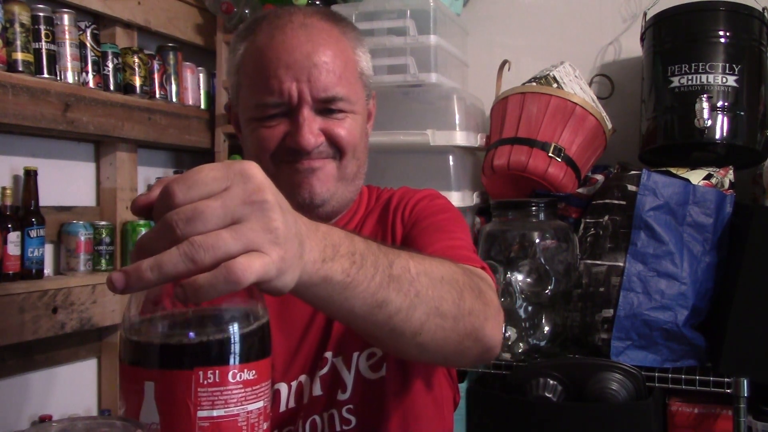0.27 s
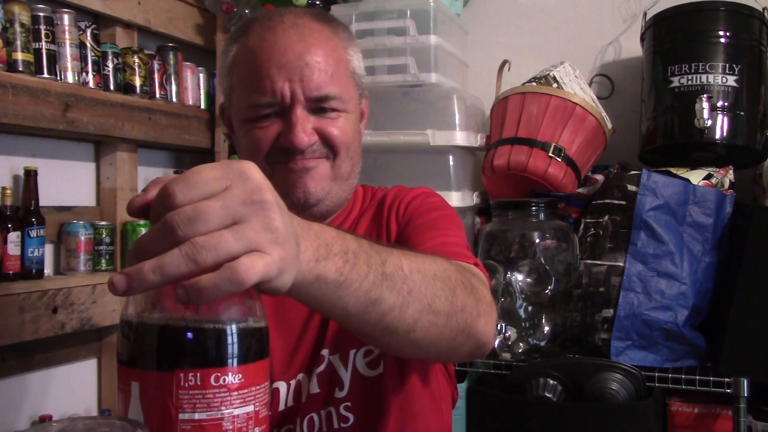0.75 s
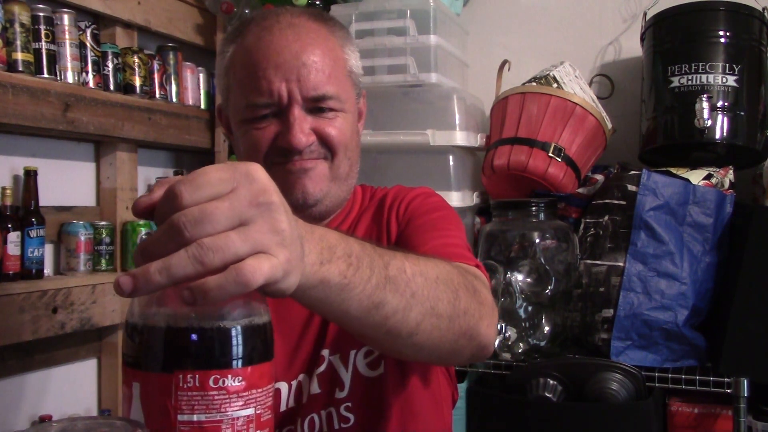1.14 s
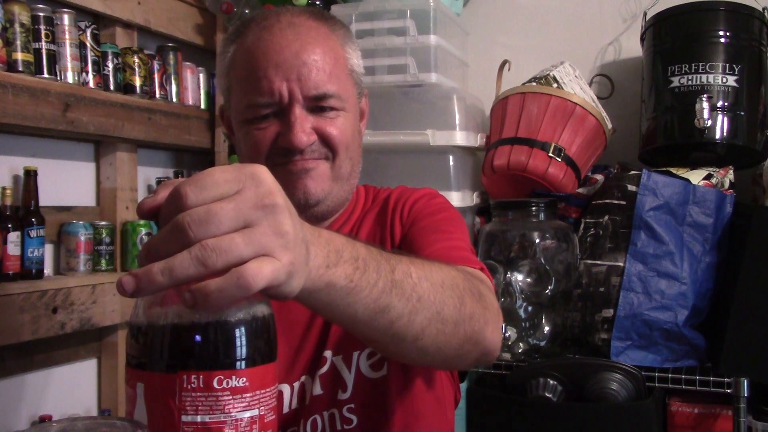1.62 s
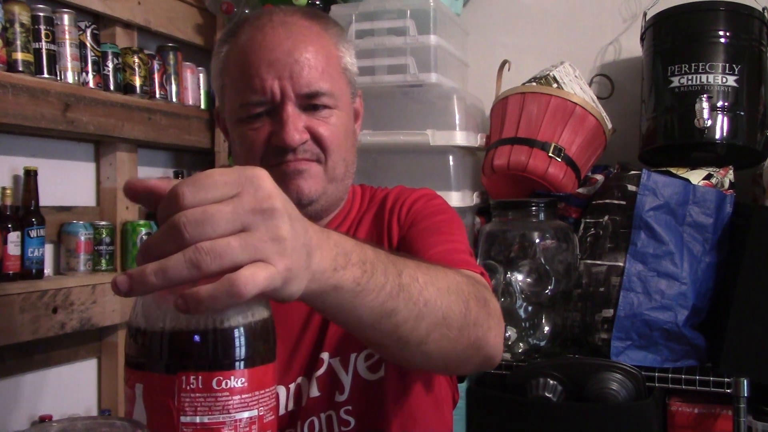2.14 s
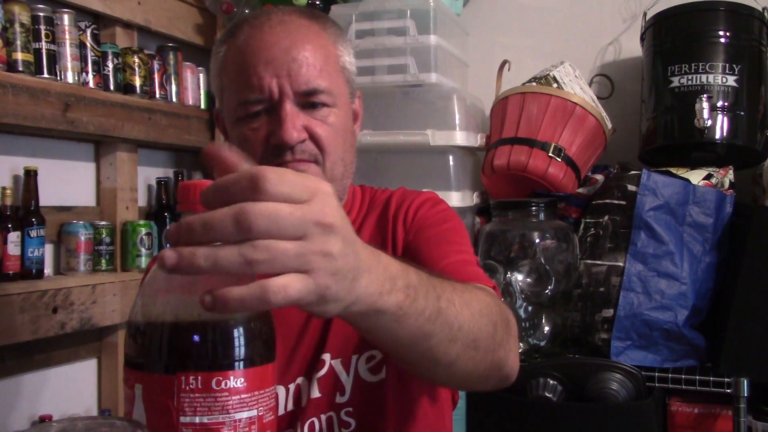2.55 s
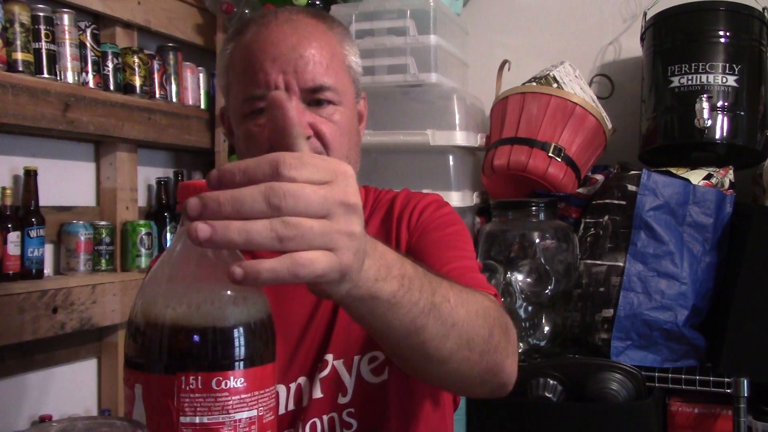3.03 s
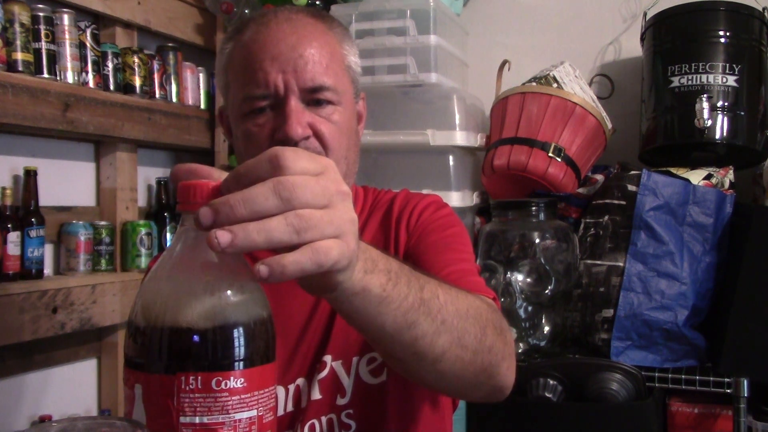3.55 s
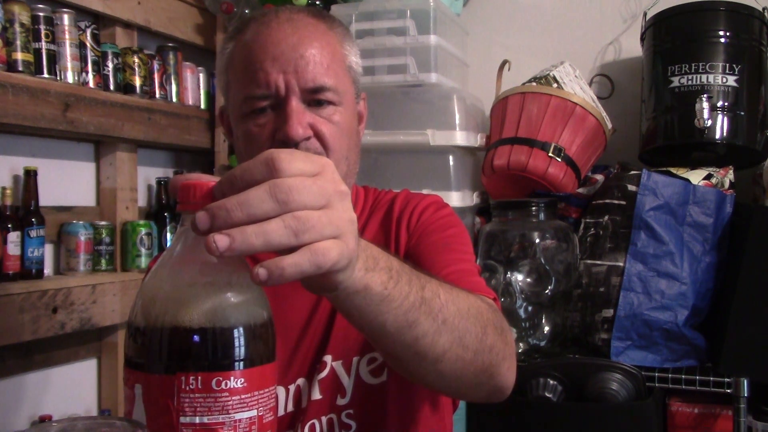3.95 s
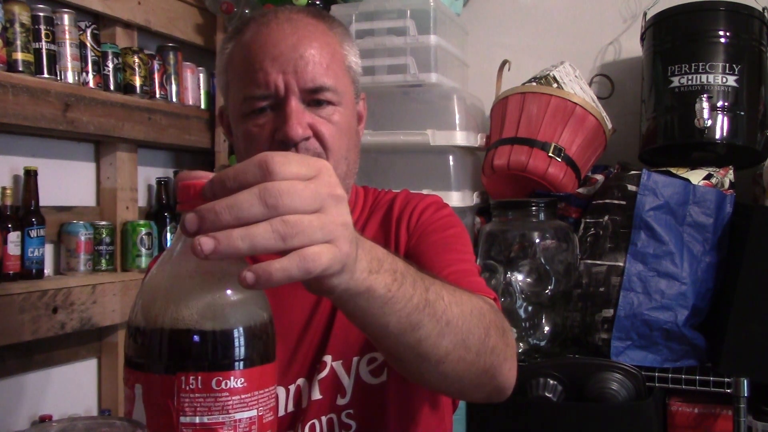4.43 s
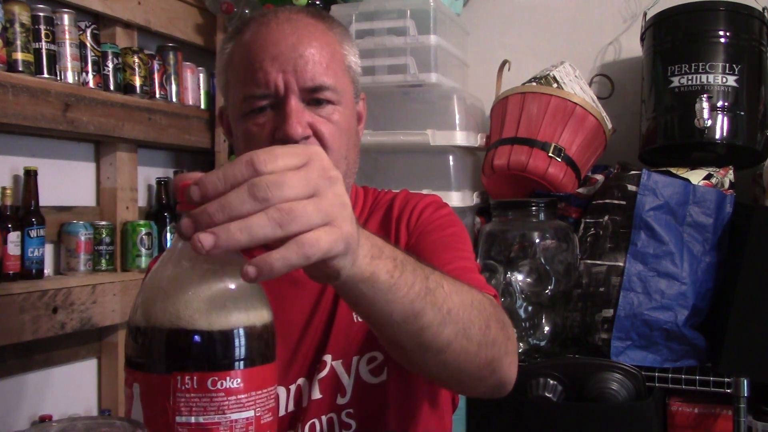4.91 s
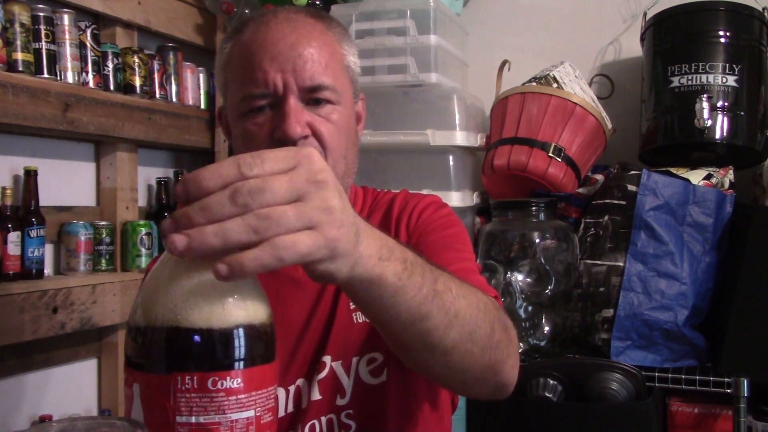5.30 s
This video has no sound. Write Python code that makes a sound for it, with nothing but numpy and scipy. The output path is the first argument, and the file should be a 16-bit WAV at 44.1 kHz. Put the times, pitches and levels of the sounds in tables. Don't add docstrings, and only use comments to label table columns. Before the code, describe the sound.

A loud, bright gas hiss bursts from a loosened plastic bottle cap, dies away to a thin whistling leak, then the cap rasps shut.

```python
import sys
import numpy as np
from scipy import signal
from scipy.fft import rfft, irfft, next_fast_len
from scipy.io import wavfile

SR = 44100
rng = np.random.default_rng(int(sys.argv[2]) if len(sys.argv) > 2 else 0)


def rack_gain(trim_db):
    fader = np.asarray(trim_db, float)
    return 10 ** (fader / 20)


def wav_out(sig):
    wavfile.write(sys.argv[1], SR, np.round(np.clip(np.atleast_2d(sig).T, -1, 1) * 32767).astype(np.int16))


N = 245548
SIZE = next_fast_len(N + SR)
HZ = np.maximum(np.arange(SIZE // 2 + 1) * SR / SIZE, 1)


def rms_one(x):
    return x / np.sqrt(np.mean(x ** 2) + 1e-20)


def over_hz(points):
    hz, value = np.transpose(points)
    return np.interp(np.log(HZ), np.log(hz), value)


def colour(points, peaks):
    humps_db = sum(db / (1 + (2 * (HZ - hz) / width_hz) ** 2) for hz, width_hz, db in peaks)
    return rack_gain(over_hz(points) + humps_db)


def flutter(rate_hz):
    r = np.exp(-80 * np.pi * rate_hz / SR)
    slow = signal.lfilter([1], [1, -2 * r, r * r], rng.standard_normal(N // 40 + 2002))[2000:]
    return np.interp(np.arange(N) / 40, np.arange(len(slow)), rms_one(slow))


def follow(control, full_db, layers, *changes_s):
    s = np.union1d(np.transpose(control)[0], changes_s)
    swing = np.interp(s, *np.transpose(control)) - full_db
    change = np.interp(s, changes_s[0], [0, 1])
    levels = [full_db + db + share * swing + gain_db * change for db, share, gain_db in layers]
    return np.transpose([s] + levels)


def gas(rows, gain, split_hz, fade_s, gust_db, own_db, sputter_db):
    t = np.arange(N) / SR
    s, *levels = np.transpose(rows)
    lumps = rack_gain(sputter_db * flutter(150))
    spectrum = rfft(rng.standard_normal(N) * lumps, SIZE) * gain
    gust = gust_db * flutter(9.4)
    out, below = 0, 0
    for level_db, edge_hz in zip(levels, list(split_hz) + [SR * 9]):
        upto = 1 / (1 + (HZ / edge_hz) ** 16)
        band = rms_one(irfft(spectrum * (upto - below), SIZE)[:N])
        out = out + band * rack_gain(np.interp(t, s, level_db) + gust + own_db * flutter(28))
        below = upto
    fade_in = np.clip((t - s[0]) / fade_s + (s[0] == 0), 0, 1) ** .5
    fade_out = np.clip((s[-1] - t) / fade_s, 0, 1) ** .5
    return out * fade_in * fade_out


def rings(events, trim_db, crack):
    out, t = np.zeros(N + SR), np.arange(SR // 5) / SR
    dull = signal.butter(3, [600, 4000], "band", fs=SR, output="sos")
    burst = rng.standard_normal((len(events), len(t))) * np.exp(-t / 0.0012)
    cracks = signal.sosfilt(dull, burst)
    for k, ((s, db, hz, t60_s), noise) in enumerate(zip(events, cracks)):
        onset = np.minimum(hz * t * 2, 1)
        tone = np.sin(2 * np.pi * hz * t) * onset * 1000. ** (-t / t60_s)
        out[round(s * SR):][:len(t)] += (-1) ** k * rack_gain(db + trim_db) * (tone + crack * noise)
    return out[:N]


# f/Hz, density/dB
HUM_COLOUR = [(13, -47), (22, -18.5), (165, 5.5), (710, 0), (935, -1), (1170, -5.5), (1300, 0),
              (1490, -4.5), (3420, -11), (5030, -17), (6620, -18.5), (7810, -21), (8720, -26.5),
              (10900, -28), (16000, -34.5)]
# f/Hz, width/Hz, gain/dB
HUM_PEAKS = [(158.8, 37, 1), (274, 150, 3.5), (990, 110, 5.5), (1354, 120, 5.5)]
# f/Hz, likeness/1
HUM_LIKENESS = [(60, 0.55), (180, 0.53), (550, 0.6), (1650, 0.83), (4970, 0.49), (15000, 0.91)]


def hum():
    mid, side = rfft(rng.standard_normal((2, SIZE))) * colour(HUM_COLOUR, HUM_PEAKS)
    alike = np.clip(over_hz(HUM_LIKENESS), 0, 1)
    pair = [np.sqrt(1 + alike) * mid + sign * np.sqrt(1 - alike) * side for sign in (1, -1)]
    return rack_gain(-56) * rms_one(irfft(np.array(pair), SIZE)[:, :N])


# f/Hz, density/dB
HISS_COLOUR = [(1760, -29), (3000, -3.5), (3570, -9.5), (6440, -6.5), (13100, -21), (16000, -27.5)]


def hiss():
    spectrum = rfft(rng.standard_normal(SIZE)) * colour(HISS_COLOUR, [])
    return rack_gain(-69.5) * rms_one(irfft(spectrum, SIZE)[:N])


# t/s, peak/dB
TICKS = [(2.5237, -46), (2.5641, -52), (2.6637, -49), (2.8035, -50), (2.8424, -55), (2.9228, -49),
         (2.9786, -49), (3.0614, -45), (3.1028, -45), (3.3822, -44), (3.4131, -48), (3.6431, -44),
         (3.705, -51), (3.7449, -49), (3.8247, -51), (4.0627, -49), (4.0794, -57), (4.2847, -52),
         (4.365, -52), (4.6433, -44.5), (4.6848, -52), (4.8249, -50), (4.8635, -47), (4.9043, -53),
         (5.083, -44)]


def ticks():
    fields_s = np.arange(2.523, 5.0, .02)
    faint_share, faint_db = .15, -56
    draws = rng.random((len(fields_s), 2))
    faint = [(s, faint_db + 6 * (b - .5)) for s, (a, b) in zip(fields_s, draws) if a < faint_share]
    steps = [(s, db - 1) for s, db in TICKS] + faint
    ring_hz = 2090 + 90 * rng.standard_normal(len(steps))
    return rings([(s, db, hz, 0.011) for (s, db), hz in zip(steps, ring_hz)], 4.6, crack=0.24)


# f/Hz, level/dB
ROOM_SPREAD = [(500, -25), (1000, -82.5), (2000, -18.5), (4000, -9), (8000, -9.5), (12000, -7.5),
               (16000, -11)]


def shed(x):
    t60_s, room_db = .15, -7.0
    t = np.arange(SR // 2) / SR
    tails = rng.standard_normal((2, len(t))) * 1000. ** (-t / t60_s) * (t > .003)
    mid, side = [rfft(tail / np.sqrt(np.sum(tail ** 2)), SIZE) for tail in tails]
    side = rack_gain(over_hz(ROOM_SPREAD)) * side
    paths = [1 + rack_gain(room_db) * (mid + sign * side) for sign in (1, -1)]
    return irfft(rfft(x, SIZE) * np.array(paths), SIZE)[:, :N]


# t/s, peak/dB, f/Hz, t60/s
KNOCKS = [
    (2.2, -43, 272, .07),
    (5.217, -46, 205, .09),
    (5.515, -49, 880, .04),
    (5.521, -50, 520, .04),
    (5.525, -46, 235, .06),
]


def knocks():
    return rings(KNOCKS, -.1, crack=0)


# f/Hz, peak/dB, t60/s
SNAP = [(1050, -34, .013), (1500, -34, .011), (2080, -31, .014), (2700, -37, .009), (3300, -38, .008)]


def snap():
    return rings([(5.2118, db, hz, t60_s) for hz, db, t60_s in SNAP], -3.2, crack=0.21)


# t/s, peak/dB, f/Hz, t60/s
CREAKS = [
    (2.668, -46, 818, 0.008),
    (2.689, -46, 850, 0.021),
    (2.731, -45, 980, 0.016),
    (4.72, -46, 1350, 0.012),
    (5.186, -46, 1330, 0.011),
]


def creaks():
    return rings(CREAKS, 2.0, crack=0.65)


# t/s, level/dB
GRIP = [(2.22, -56), (2.3, -55.5), (2.46, -55), (2.6, -66), (2.66, -54.5), (2.668, -46), (2.694, -55),
        (2.702, -68), (2.8, -61)]
# f/Hz, density/dB
GRIP_COLOUR = [(400, -49), (750, -22), (2000, -4), (4000, 2), (6000, -35)]
# offset/dB, share of swing/1, later gain/dB
GRIP_LAYERS = [(-2.5, 1.35, 0.013), (-4.5, 0.96, 0), (-5.5, .7, 0)]


def grip():
    rows = follow(GRIP, -49, GRIP_LAYERS, (2.3, 2.6))
    return gas(rows, colour(GRIP_COLOUR, []), [1200, 2300], .03, gust_db=0, own_db=0, sputter_db=2.5)


# t/s, peak/dB, low f/Hz, high f/Hz, decay/s
SPITS = [(1.8808, -27, 7500, 12000, .0015), (1.9192, -30, 11000, 17000, .0008),
         (2.1645, -37, 3000, 14000, .001), (2.668, -37, 900, 4200, .002), (5.1075, -38, 2200, 13000, .003),
         (5.1185, -39, 5000, 16000, .0015), (5.244, -52, 8000, 11000, .001),
         (5.386, -44, 7000, 13500, .001), (5.404, -45, 2000, 9000, .002)]


def spits():
    out, t = np.zeros(N + SR), np.arange(SR // 20) / SR
    noises = rng.standard_normal((len(SPITS), len(t)))
    for (s, db, low_hz, high_hz, decay_s), noise in zip(SPITS, noises):
        band = signal.butter(2, [low_hz, high_hz], "band", fs=SR, output="sos")
        out[round(s * SR):][:len(t)] += rack_gain(db) * signal.sosfilt(band, noise * np.exp(-t / decay_s))
    return out[:N]


# t/s, level/dB
SHUT = [(5.24, -75), (5.246, -70), (5.29, -48.5), (5.302, -58.5), (5.38, -49.5), (5.408, -51), (5.424, -62),
        (5.438, -73), (5.47, -66)]
# f/Hz, density/dB
SHUT_COLOUR = [(700, -10), (2600, -14), (3400, -16), (3800, -9), (5700, -9), (6500, -13), (8500, -20),
               (9500, -17), (11500, -19), (13000, -30), (16000, -40)]
# f/Hz, width/Hz, gain/dB
SHUT_PEAKS = [(4000, 350, 6), (5300, 600, 9)]
# offset/dB, share of swing/1, gain once tight/dB
SHUT_LAYERS = [(-9.5, 0.28, -1.5), (-8, 0.82, 7.5), (-1.3, 0.89, -4.5), (-13.5, 0.8, 8), (-10.5, 1.06, -11)]


def twist_shut():
    rows = follow(SHUT, -46.5, SHUT_LAYERS, (5.29, 5.475))
    return gas(rows, colour(SHUT_COLOUR, SHUT_PEAKS), [3500, 4600, 6000, 8800], .015,
               gust_db=0, own_db=0, sputter_db=2.5)


# t/s, level/dB
LEAK = [(2.2, -68), (2.29, -45.5), (2.5, -48.5), (2.7, -47), (3.5, -49.5), (4.1, -53), (4.55, -62.5),
        (5.05, -65), (5.26, -72)]
# f/Hz, density/dB
LEAK_COLOUR = [(400, -52), (750, -14), (1300, -11), (2000, -10), (2900, -14.5), (4200, -5), (5500, -2),
               (8000, -5.5), (12000, -17), (13500, -18), (16000, -18)]
# f/Hz, width/Hz, gain/dB
SLIP_PEAKS = [(4300, 500, 3), (5500, 1100, 7), (7000, 800, 2), (10800, 700, 5)]
LEAK_PEAKS = [(4990, 650, 7.5), (6700, 500, -3), (7850, 650, 7), (9200, 500, 2), (10100, 500, -3),
              (10900, 600, 2), (12500, 1100, 6)]
FOAM_PEAKS = [(5020, 620, 7.5), (6700, 500, -3), (7850, 650, 7), (8700, 400, -6), (9600, 800, 8),
              (10900, 500, 3), (12200, 1000, 3)]
LEAK_STAGES = [(.1, -6.5, -11, -9), (.1, -1.7, -11.5, -4), (.1, -2.4, -4.6, -4)]


def leak():
    full_db = -49
    follows = [0.75, 0.72, 1.03, 1.02]
    t = np.arange(N) / SR
    s, pressure_db = np.transpose(LEAK)
    settled = np.interp(t, (2.38, 2.6), [0, 1])
    foamed = np.interp(t, (3.0, 3.5), [0, 1])
    dulling_db = -1.5 * np.interp(s, (3.3, 5.9), [0, 1])
    shares = [1 - settled, settled - foamed, foamed]
    out = 0
    for peaks, share, stage in zip([SLIP_PEAKS, LEAK_PEAKS, FOAM_PEAKS], shares, LEAK_STAGES):
        levels = [full_db + db + k * (pressure_db - full_db) for db, k in zip(stage, follows)]
        first, second, third, top = levels
        top = top + dulling_db
        air = top - 5.0 + 1.0 * (top - first)
        rows = np.transpose([s, first, second, third, top - .6, air])
        whistle = gas(rows, colour(LEAK_COLOUR, peaks), [6500, 8800, 10500, 13300], 0.071,
                      gust_db=-0.04, own_db=0.5, sputter_db=0.45)
        out = out + np.sqrt(share) * whistle
    return out


# t/s, level/dB
JET = [(0, -28), (.08, -25.5), (.31, -23), (.53, -15.5), (.88, -14), (1.36, -21), (1.56, -28), (1.93, -47),
       (2.3, -42.5)]
# f/Hz, density/dB
JET_COLOUR = [(35, -75), (60, -33.5), (108, -40), (294, -27), (579, -24), (682, -27), (1010, -17.5),
              (1700, -14), (2140, -5.5), (2520, -14), (4120, -2), (7570, 0), (11000, -6), (14600, -8.5),
              (16000, -16.5)]
# f/Hz, width/Hz, gain/dB
JET_PEAKS = [(944, 400, 4.5), (2033, 220, 6), (2180, 73, 6), (3950, 540, 4), (7000, 4800, 3),
             (11400, 2400, 5.5), (14500, 1200, 9)]
# f/Hz, width/Hz, gain/dB
WHISTLES = [(4404, 40, 4), (4524, 40, 4), (4730, 60, 3), (4972, 40, 5), (5740, 30, 4), (5820, 50, 4),
            (6570, 50, 8), (6724, 30, 4), (6870, 60, 4), (7056, 30, 5), (7305, 60, 5), (7592, 50, 4),
            (7688, 50, 5), (8084, 30, 4), (8460, 50, 3), (8938, 40, 5), (9067, 30, 4)]
# offset at full flow/dB, share of swing/1, gain once wide/dB
JET_LAYERS = [(-34, 0.88, 12.5), (-23, 2.5, 10.5), (-12.5, 0.73, -0.5), (-16, 1.26, 5.5), (0.5, 0.97, -1),
              (-0.5, 1.21, -3.5)]


def jet():
    opening_s = (0.094, 1.88)
    turn_s = (2.18, 2.23)
    s, body, roar, cavity, dip, main, top = follow(JET, -12, JET_LAYERS, opening_s, turn_s).T
    body = 10 * np.log10(rack_gain(body) ** 2 + rack_gain(roar) ** 2)
    cavity = cavity - 11 * np.interp(s, turn_s, [0, 1])
    air = top - 4.2 + 0.95 * (top - main)
    rows = np.transpose([s, body, cavity, dip, main, top - 1.1, air])
    return gas(rows, colour(JET_COLOUR, [*JET_PEAKS, *WHISTLES]), [1700, 2550, 3500, 9000, 12000], 0.095,
               gust_db=-0.2, own_db=0.56, sputter_db=0.41)


def scene():
    hands = grip() + creaks() + snap() + knocks()
    escaping = rack_gain(-1.82) * jet() + rack_gain(-1.0) * leak() + twist_shut() + spits()
    bottle = shed(escaping + hands) * rack_gain([[.4], [-.4]])
    return bottle + ticks() + hum() + hiss()


def band_limit(x):
    return signal.sosfilt(signal.butter(12, 16360, fs=SR, output="sos"), x)


def record(dry):
    low_pass = signal.cheby2(22, 55, 16050, fs=SR, output="sos")
    mix = np.clip(signal.sosfilt(low_pass, dry), -1, 1)
    return band_limit(mix)


dry = scene()
out = record(dry)
wav_out(out)
```